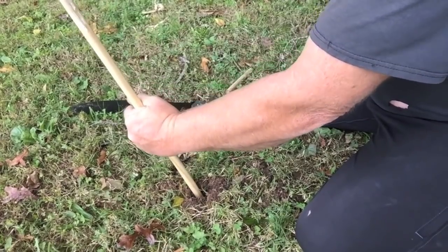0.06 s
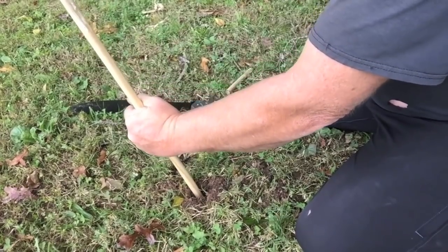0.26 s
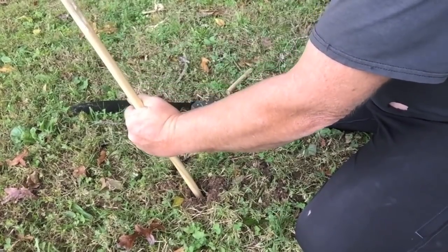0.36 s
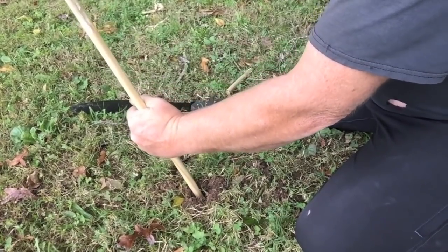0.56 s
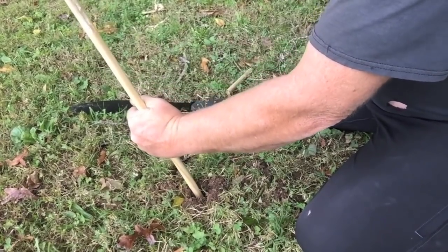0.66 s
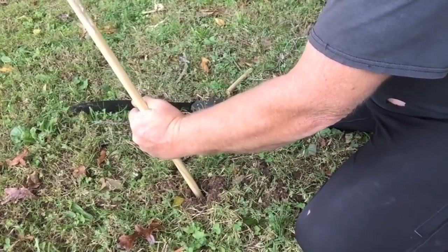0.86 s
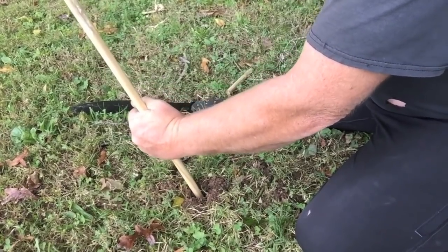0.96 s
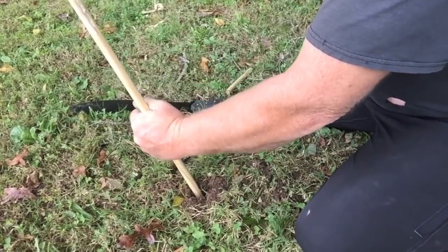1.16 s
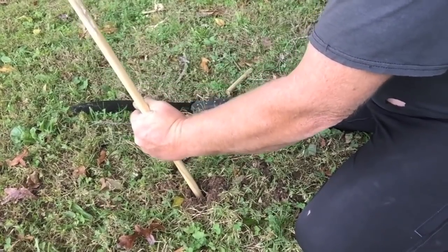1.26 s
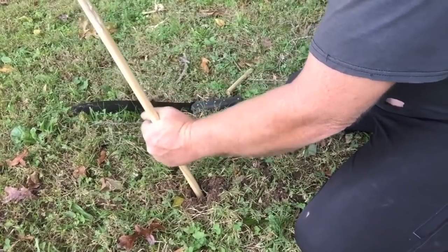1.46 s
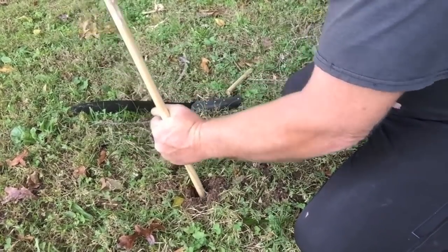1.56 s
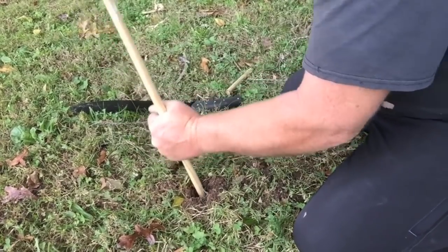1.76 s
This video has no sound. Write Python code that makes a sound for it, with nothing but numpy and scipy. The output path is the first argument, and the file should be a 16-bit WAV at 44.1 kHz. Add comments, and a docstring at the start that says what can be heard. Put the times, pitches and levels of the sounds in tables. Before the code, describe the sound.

Four sharp hammer knocks on a thin wooden stake outdoors, with wind rumbling on the microphone

```python
"""Stake driven into a lawn

Four hammer blows hit a thin wooden stake held in a fist: damped modes, a crack of noise, scatter and a thud.
They overload the close microphone; the hammer sometimes taps the stake again on the rebound.
Wind is shaped noise: continuous rumble plus abrupt low bursts, over an outdoor hiss."""
import sys
import numpy as np
from scipy import signal
from scipy.fft import rfft, irfft
from scipy.io import wavfile

SR = 44100
rng = np.random.default_rng(int(sys.argv[2]) if len(sys.argv) > 2 else 0)


def dump_mix(stems):
    """Bounce the given channels to the path in sys.argv[1] as a 16-bit WAV at rate SR."""
    frames = np.atleast_2d(stems).T  # one column per channel
    limited = np.clip(frames, -1, 1)  # hard clip at full scale
    pcm = np.round(limited * 32767).astype(np.int16)
    wavfile.write(sys.argv[1], SR, pcm)


N = 79380
TIME_S = np.arange(N) / SR
AGE_S = np.arange(SR // 5) / SR   # time since the start of an event


def from_db(db):
    """Decibels to gain."""
    return 10 ** (np.asarray(db) / 20)


def rms(x):
    """Root mean square."""
    return np.sqrt(np.mean(x ** 2))


def rms_one(x):
    """Scale to unit rms."""
    return x / np.sqrt(np.mean(x ** 2) + 1e-20)


def cut(x, hz, kind, order):
    """Butterworth low- or high-pass."""
    sos = signal.butter(order, np.clip(hz, 10, 0.45 * SR), kind, fs=SR, output="sos")
    return signal.sosfilt(sos, x + 1e-18)


def noise(colour, size):
    """Unit-rms noise with a given spectrum, interpolated over log frequency."""
    hz, db = np.transpose(colour)
    bins_hz = np.maximum(np.arange(size // 2 + 1) * SR / size, 1)
    gain = from_db(np.interp(np.log(bins_hz), np.log(hz), db))
    return rms_one(irfft(rfft(rng.standard_normal(size)) * gain, size))


def rise(time_s):
    """Exponential attack."""
    return 1 - np.exp(-AGE_S / time_s)


def decay(t60_s):
    """Exponential fall, 60 dB in t60_s."""
    return np.exp(-np.log(1000) * AGE_S / t60_s)


def ring(hz, t60_s):
    """A damped sine."""
    return decay(t60_s) * np.sin(2 * np.pi * hz * AGE_S)


def burst(envelope, count=4):
    """Noise under an envelope, its spectrum evened out, carrying the energy of that envelope."""
    x = envelope * rng.standard_normal(len(AGE_S))
    for _ in range(count):
        flat = irfft(np.exp(1j * np.angle(rfft(x))), len(AGE_S))
        x = flat * np.sqrt(envelope)
    return rms_one(x) * rms(envelope)


def add(out, start_s, sound):
    """Mix a sound in at a time."""
    start = max(int(start_s * SR), 0)
    out[start:start + len(sound)] += sound[:max(N - start, 0)]


# colour of the outdoor hiss: freq_hz, level_db
HISS_COLOUR = [(100, 9), (400, 0), (800, 0), (1500, -0.5), (3000, 0.5), (4500, -1.5), (7000, -1.5),
               (9500, -8), (11000, -9), (15500, -14.5)]
HISS_DB = -41.5
RIPPLE_DB, RIPPLE_SPACING_HZ = 1.6, 69.9
SWELL_DB, SWELL_SPACING_S = 0.5, 0.169


def hiss():
    """Outdoor hiss: noise with a randomly rippled spectrum and faint random swells."""
    spectrum = rfft(noise(HISS_COLOUR, size=N))
    bins = np.arange(len(spectrum))
    ripple = np.interp(bins * SR / N / RIPPLE_SPACING_HZ, bins, rng.standard_normal(len(bins)))
    swell = np.interp(TIME_S / SWELL_SPACING_S, bins, rng.standard_normal(len(bins)))
    rippled = rms_one(irfft(spectrum * from_db(RIPPLE_DB * ripple), N))
    return from_db(HISS_DB + SWELL_DB * swell) * rippled


# strength of the breeze: time_s, level_db
WIND_LEVEL = [(0, -41), (0.08, -41.5), (0.15, -28.5), (0.25, -38.5), (0.37, -30.5), (0.461, -29.5),
              (0.5, -50), (0.556, -16), (0.67, -34.5), (0.75, -29.5), (0.84, -37.5), (0.95, -22.5),
              (1.04, -31.5), (1.15, -24.5), (1.29, -32.5), (1.499, -22), (1.64, -38.5), (1.8, -34.5)]
# colour of its rumble: freq_hz, level_db
WIND_COLOUR = [(22, -60), (40, 3), (62, 9), (100, 3.5), (160, -6), (300, -18.5), (500, -21.5), (800, -33),
               (1600, -52)]


def wind():
    """Wind on the microphone: low noise that follows the strength of the breeze."""
    time_s, level_db = np.transpose(WIND_LEVEL)
    return from_db(np.interp(TIME_S, time_s, level_db)) * noise(WIND_COLOUR, size=N)


# wind buffets on the microphone: start_s, length_s, level_db, upper_edge_hz
BUFFETS = [(0.098, 0.0055, -37.5, 326), (0.219, 0.0056, -19.5, 375), (0.277, 0.01, -27.5, 204),
           (0.355, 0.0034, -25.5, 614), (0.4013, 0.0055, -22, 680), (0.405, 0.0049, -6.5, 152),
           (0.413, 0.012, -27.5, 503), (0.431, 0.0087, -22, 99), (0.535, 0.015, -20.5, 111),
           (0.573, 0.018, -24.5, 344), (0.642, 0.01, -26.5, 420), (0.697, 0.014, -19.5, 173),
           (0.774, 0.01, -14, 284), (0.7815, 0.0069, -20.5, 644), (0.782, 0.0091, -13.5, 143),
           (0.859, 0.013, -8, 700), (0.862, 0.0094, -7, 163), (0.873, 0.0055, -9, 725),
           (0.893, 0.025, -33, 129), (0.924, 0.0084, -16, 376), (0.949, 0.0123, -17, 254),
           (1.009, 0.012, -22.5, 306), (1.073, 0.0065, -15, 670), (1.078, 0.012, -18, 200),
           (1.085, 0.0053, -22, 640), (1.119, 0.069, -35.5, 464), (1.148, 0.014, -27.5, 332),
           (1.194, 0.0055, -14.5, 137), (1.315, 0.011, -22.5, 483), (1.323, 0.011, -18.5, 218),
           (1.383, 0.0067, -18.5, 313), (1.43, 0.038, -27.5, 528), (1.459, 0.0051, -10.5, 680),
           (1.463, 0.013, -9.5, 129), (1.475, 0.0066, -16, 570), (1.538, 0.0092, -23, 495),
           (1.683, 0.015, -34, 695), (1.697, 0.019, -31, 129)]
BUFFET_ATTACK_S = 0.0004
BUFFET_LOW_HZ, BUFFET_KNEE_HZ = 49.3, 275


def buffets():
    """Eddies hit the microphone as abrupt bursts of low turbulence with a Gaussian fall."""
    out = np.zeros(N)
    for start_s, length_s, level_db, edge_hz in BUFFETS:
        swell = rise(BUFFET_ATTACK_S) * np.exp(-(AGE_S / length_s) ** 2 / 2)
        eddy = cut(burst(swell), BUFFET_KNEE_HZ, "low", order=1)
        eddy = cut(eddy, edge_hz, "low", order=6)
        eddy = cut(eddy, BUFFET_LOW_HZ, "high", order=2)
        add(out, start_s, from_db(level_db) * rms_one(eddy) * rms(swell))
    return out


# centres of the ranges of modes that each blow favours differently: freq_hz
RANGES_HZ = [750, 1400, 1950, 3200, 4300, 6200]
RING_RISE_S = 0.0007
CRACK_DB, CRACK_RISE_S, CRACK_T60_S, CRACK_LOW_HZ = 2.5, 0.0001, 0.02, 1430


def knock(modes, crack_db, ranges_db):
    """Hammer on end grain: ringing modes of alternate sign and a short crack of the fibres."""
    wood = 0
    for k, (hz, mode_db, t60_s) in enumerate(modes):
        favour_db = np.interp(np.log(hz), np.log(RANGES_HZ), ranges_db)
        wood = wood + (-1) ** k * from_db(mode_db + favour_db) * ring(hz, t60_s)
    crack = burst(decay(CRACK_T60_S) * rise(CRACK_RISE_S))
    crack = cut(crack, CRACK_LOW_HZ, "high", order=1)
    return wood * rise(RING_RISE_S) + from_db(CRACK_DB + crack_db) * crack


# modes of the stake touched lightly: freq_hz, level_db, t60_s
TOUCH_MODES = [(1002, 1.5, 0.018), (1480, 0, 0.013), (2110, 7.5, 0.011), (2950, 5, 0.0087),
               (3840, 6, 0.014), (4550, -7, .015), (5130, -7, 0.016), (5350, -5, 0.011), (6900, -5, .012)]
# rebound touches: start_s, level_db, bright_hz, crack_db (added to CRACK_DB)
REBOUNDS = [(0.5968, -24.5, 6500, 6), (0.9224, -27.5, 4600, 8.5), (0.927, -31.5, 3300, 11),
            (0.9517, -17, 3540, 7), (1.2596, -23.5, 1980, -7)]
REBOUND_LOW_HZ = 846    # light touches barely move the lowest mode
REBOUND_TOP_HZ = 7200   # a light touch lasts too long to excite anything higher


def rebounds():
    """The hammer touches again on the rebound: softer, duller knocks with their own modes."""
    out = np.zeros(N)
    for start_s, level_db, bright_hz, crack_db in REBOUNDS:
        touch = knock(TOUCH_MODES, crack_db, np.zeros(len(RANGES_HZ)))
        touch = cut(touch, REBOUND_LOW_HZ, "high", order=4)
        touch = cut(touch, REBOUND_TOP_HZ, "low", order=8)
        touch = cut(touch, bright_hz, "low", order=3)
        add(out, start_s, from_db(level_db) * touch)
    return out


# modes of the stake, damped by hand and soil: freq_hz, level_db, t60_s
STAKE_MODES = [(588, -17.5, 0.027), (744, -24, 0.0054), (977, -10, 0.021), (1254, 1, 0.014),
               (1487, -2.5, 0.016), (1972, 10.5, 0.0082), (2258, 0, 0.01), (2519, 3.5, 0.0088),
               (3020, -4, 0.012), (3160, -11.5, 0.0099), (3590, -1.5, 0.011), (3872, -9, 0.014),
               (4259, -1, 0.018), (4480, -7.5, 0.012), (5067, -7, 0.016), (5937, 3.5, 0.0073),
               (6330, -2, 0.012), (7695, 1.5, 0.01), (9420, -12.5, 0.017)]
# colour of the scatter round the yard: freq_hz, level_db
SCATTER_COLOUR = [(400, 10.5), (1000, 2), (2000, 0), (3200, -1.5), (4400, 4), (5800, -8), (7700, 1.5),
                  (10000, -10.5), (16000, -12)]
# hammer blows: start_s, level_db, bright_hz, crack_db (added to CRACK_DB), then one favour_db per RANGES_HZ
BLOWS = [(0.2008, 0.92, 9000, -0.5, 1, 1.5, 1.6, 5, 1.3, 1),
         (0.5516, -1.2, 7450, 3.5, -0.5, 0, 3.6, -2.5, 1.6, 2),
         (0.8874, -3.2, 4450, 0.5, 4, 1, 0.36, 3.5, -0.054, 4),
         (1.2435, -1.5, 9100, 0.5, -5.5, 4.5, 3.3, 7, 0.57, -2)]
SCATTER_DB, SCATTER_RISE_S, SCATTER_T60_S = -23, 0.0036, 0.13
THUD_DB, THUD_HZ, THUD_T60_S, THUD_DELAY_S = -13.5, 112.3, 0.073, 0.00636


def blows():
    """Each blow knocks the wood, scatters round the yard and thuds dully in the soil."""
    out = np.zeros(N)
    for start_s, level_db, bright_hz, crack_db, *ranges_db in BLOWS:
        wood = cut(knock(STAKE_MODES, crack_db, ranges_db), bright_hz, "low", order=2)
        scatter = noise(SCATTER_COLOUR, size=len(AGE_S)) * rise(SCATTER_RISE_S) * decay(SCATTER_T60_S)
        add(out, start_s, from_db(level_db) * (wood + from_db(SCATTER_DB) * scatter))
        thud = from_db(level_db + THUD_DB) * ring(THUD_HZ, THUD_T60_S)
        add(out, start_s + THUD_DELAY_S, thud)
    return out


def scene():
    """Hiss, wind and stake at one microphone."""
    return (hiss() + wind() + buffets() + rebounds() + blows())[None]


MIC_LOW_HZ, CUTOFF_HZ = 37.7, 16000
CEILING = 1


def record(dry):
    """The deepest bass is rolled off, overloads clip flat, the top is cut."""
    clipped = np.clip(cut(dry, MIC_LOW_HZ, "high", order=4), -CEILING, CEILING)
    top_cut = signal.ellip(10, 0.1, 70, CUTOFF_HZ, fs=SR, output="sos")   # 0.1 dB ripple, 70 dB stopband
    return signal.sosfilt(top_cut, clipped)


dry = scene()
out = record(dry)
dump_mix(out)
```